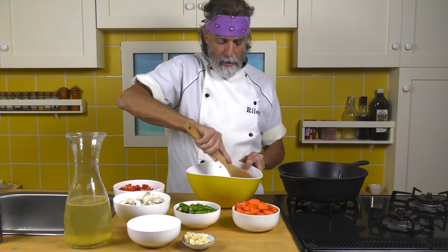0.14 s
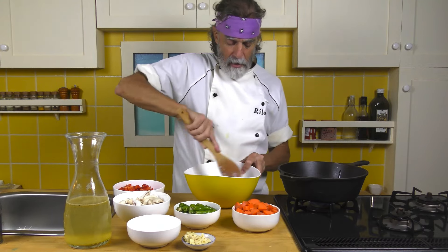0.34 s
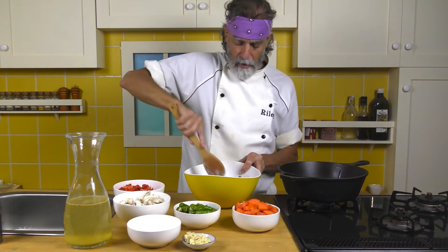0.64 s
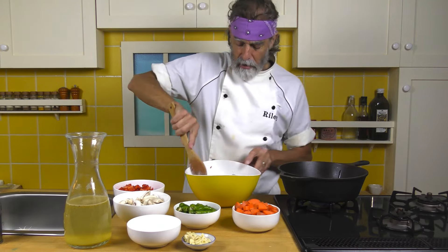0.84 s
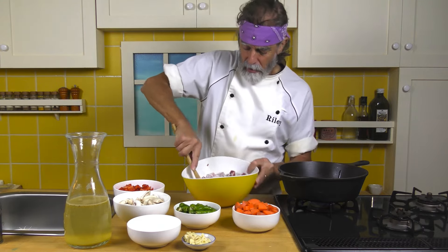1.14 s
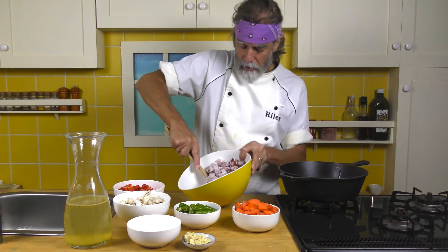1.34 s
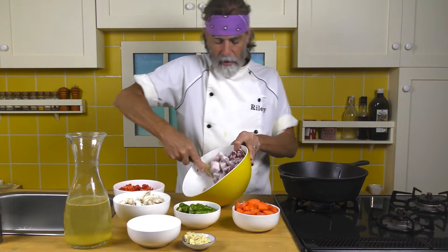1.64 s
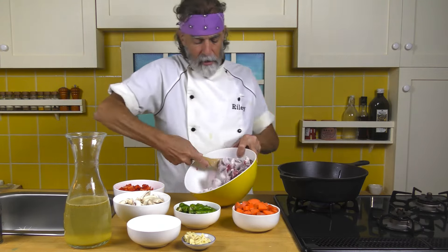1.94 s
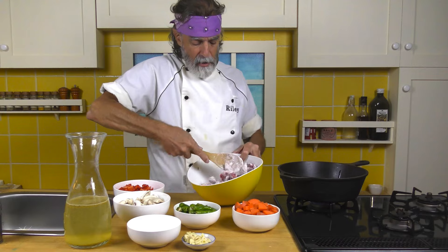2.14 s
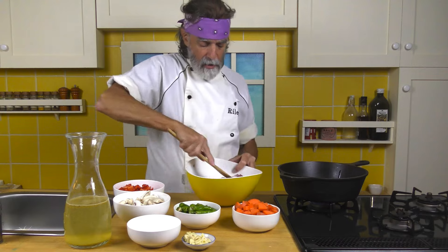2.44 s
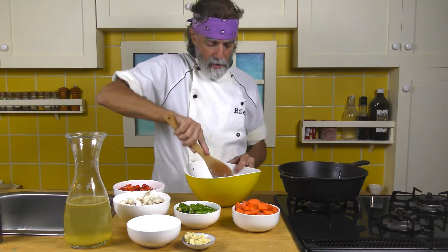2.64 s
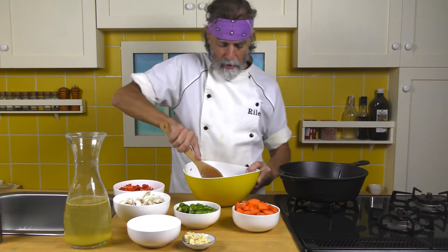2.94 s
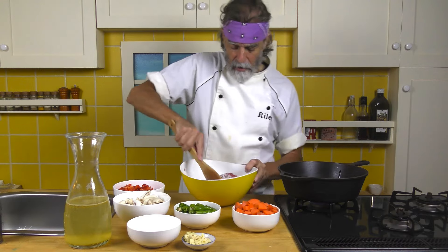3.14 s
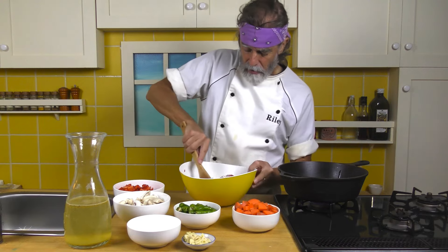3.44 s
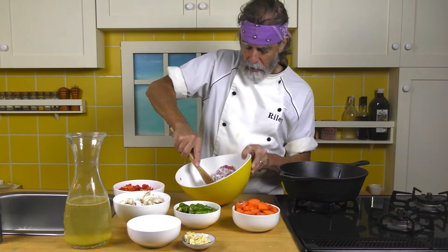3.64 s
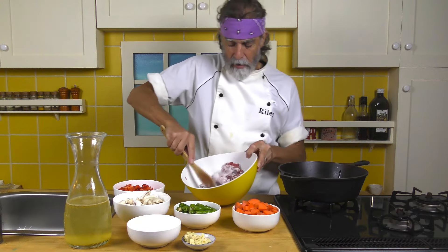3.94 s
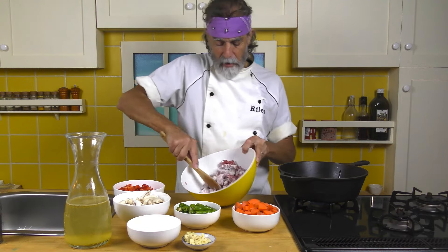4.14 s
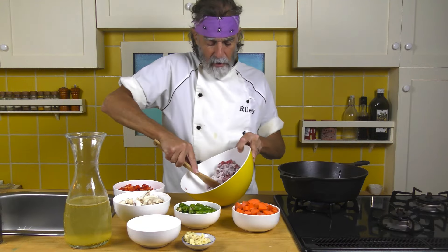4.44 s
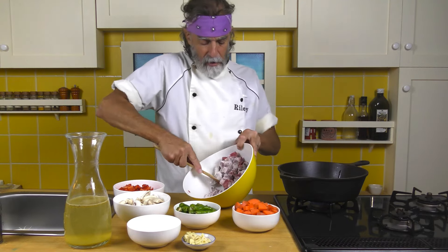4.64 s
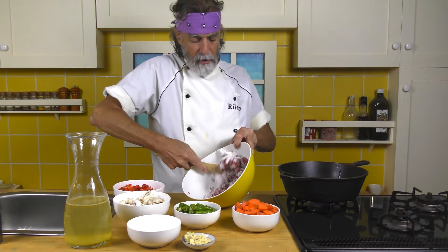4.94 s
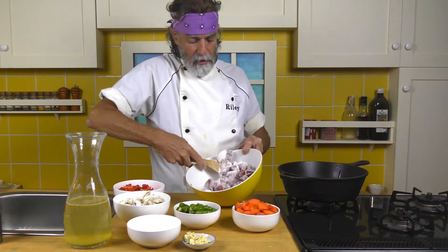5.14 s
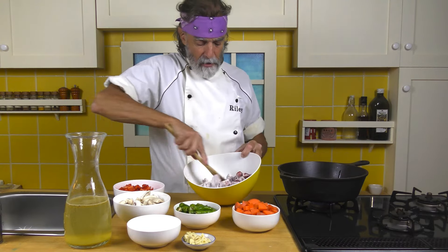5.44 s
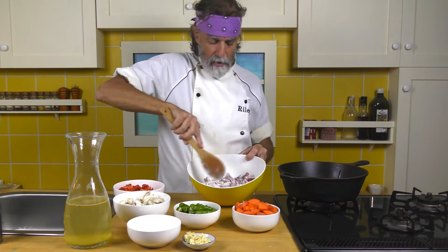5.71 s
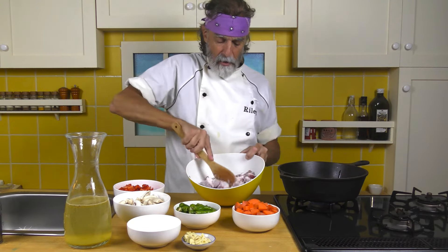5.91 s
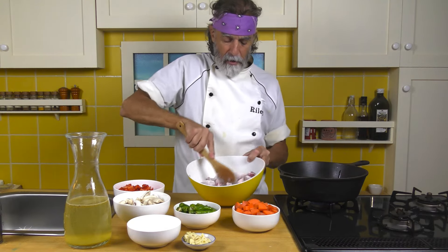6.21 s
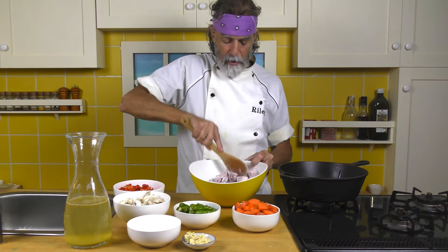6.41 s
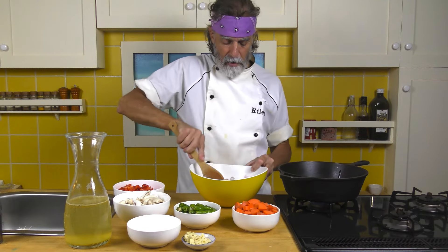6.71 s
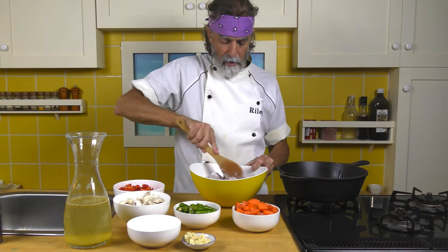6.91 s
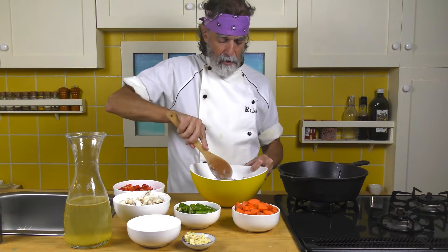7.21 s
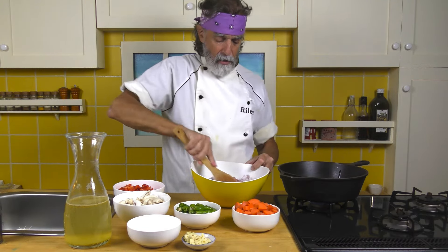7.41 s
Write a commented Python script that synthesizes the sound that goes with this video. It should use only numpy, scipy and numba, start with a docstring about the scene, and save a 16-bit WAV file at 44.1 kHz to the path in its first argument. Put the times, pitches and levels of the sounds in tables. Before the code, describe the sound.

Floured meat cubes are turned in a bowl: hollow wooden knocks, dry gritty scrapes, soft tumbling and pats, over faint ventilation hum.

```python
"""Wooden clacks and counter booms, rasping and hissing scrapes, soft tumbling, a faint ventilation hum.
A wooden spoon turns floured meat cubes in a mixing bowl on a wooden counter in a small tiled room.
Knocks are noise bursts and damped modes of bowl wall and counter; two long scoops and many short strokes
are random slip grains through a moving resonant high-pass; cubes are dense bumps and crumbling noise;
ventilation is coloured noise."""
import sys
import numpy as np
from scipy import signal
from scipy.fft import rfft, irfft, next_fast_len
from scipy.io import wavfile
from numba import njit

SR = 44100
rng = np.random.default_rng(int(sys.argv[2]) if len(sys.argv) > 2 else 0)


def dump_mix(stems):
    """Bounce the given channels to the path in sys.argv[1] as a 16-bit WAV at rate SR."""
    frames = np.atleast_2d(stems).T  # one column per channel
    limited = np.clip(frames, -1, 1)  # hard clip at full scale
    pcm = np.round(limited * 32767).astype(np.int16)
    wavfile.write(sys.argv[1], SR, pcm)


N = 333837
TIME = np.arange(N) / SR  # s
RING = np.arange(SR // 2) / SR  # time since a blow, s
LEFT_RIGHT = np.array([[1], [-1]])  # sign of the side signal
# a movement gains RISE_DB over its rise, holds, then dies away at a steady rate
RISE_DB, RELEASE_DB_PER_S = 18.5, 196

# two long scoops under the meat and up the tilted wall, levels before trims:
# each (time [s], rasp level [dB], flour hiss level [dB])
SCOOP_PATHS = [
    [(0.96, -49, -48), (1.148, -36, -42.5), (1.202, -37.5, -48), (1.232, -35.5, -38.5), (1.316, -36, -39),
     (1.374, -42.5, -52.5), (1.536, -37.5, -46), (1.602, -45.5, -50.5), (1.878, -45.5, -47),
     (1.96, -80, -77)],
    [(4.47, -51.5, -63), (4.5, -35.5, -45), (4.572, -38.5, -47), (4.638, -40.5, -55.5), (4.644, -37.5, -53),
     (4.696, -44, -51), (4.818, -37, -44), (5.02, -50.5, -48.5), (5.068, -41, -46), (5.14, -60, -59)],
]
# flour hiss spectrum: (frequency [Hz], density [dB per Hz])
FLOUR_SPECTRUM = [(2000, -16), (4000, 0.5), (6000, 2.5), (8000, 0.5), (10800, 1), (12500, -10),
                  (15500, -32.5)]


def undb(db):
    """Decibels to gain."""
    return 10 ** (np.asarray(db) / 20)


def unit(x):
    """Scale to rms 1."""
    return x / np.sqrt(np.mean(x ** 2))


def curves(table):
    """The dB columns of a timed table, sample by sample, dying away beyond both ends."""
    s, *columns = np.transpose(table)
    outside_s = np.abs(TIME - np.clip(TIME, s[0], s[-1]))
    return [np.interp(TIME, s, c) - RELEASE_DB_PER_S * outside_s for c in columns]


def colour(x, points):
    """Causal minimum-phase filter with a (Hz, dB) response, built from its cepstrum."""
    size = 2 * next_fast_len(x.shape[-1] // 2 + 2048)
    hz, db = np.transpose(points)
    bin_hz = np.arange(size // 2 + 1) * SR / size
    log_gain = np.log(undb(np.interp(np.log(bin_hz + 1), np.log(hz), db)))
    cepstrum = irfft(log_gain)
    cepstrum[1:size // 2] *= 2
    cepstrum[size // 2 + 1:] = 0
    response = np.exp(rfft(cepstrum))
    return irfft(rfft(x, size) * response)[..., :x.shape[-1]]


def walk(rate_hz):
    """Random wander with a spread near 1: straight lines between rate_hz random knots per second."""
    knots = rng.standard_normal(N // 100)
    return np.interp(TIME * rate_hz, np.arange(len(knots)), knots)


def fade(t60_s):
    """Exponential decay after a blow."""
    return np.exp(-np.log(1000) * RING / t60_s)


def burst(t60_s):
    """Decaying noise of energy 1: many modes too close to tell apart."""
    x = rng.standard_normal(len(RING)) * fade(t60_s)
    return x / np.linalg.norm(x)


def ring(modes, scatter_db, detune):
    """Damped modes of total energy 1; each point of contact weights and detunes them anew."""
    x = 0
    for hz, db, t60_s in modes:
        size, shift, side = rng.standard_normal(3)
        gain = np.sign(side) * undb(db + scatter_db * size)
        mode_hz = hz * (1 + detune * shift)
        x = x + gain * fade(t60_s) * np.sin(2 * np.pi * mode_hz * RING)
    return x / np.linalg.norm(x)


def grains(rate_hz, spread_db):
    """Tiny slips at random moments, most weak and a few strong, rms 1."""
    happens = rng.random(N) < rate_hz / SR
    sign = rng.choice([-1, 1], N)
    strength = undb(spread_db * np.minimum(rng.exponential(size=N), 4))
    return unit(happens * sign * strength)


@njit
def highpass(x, hz, damping):
    """Resonant second-order high-pass with a moving edge."""
    y, band, low = np.empty(len(x)), 0., 0.
    for i in range(len(x)):
        g = np.tan(np.pi * hz[i] / SR)
        v = (band + g * (x[i] - low)) / (1 + g * (g + damping))
        y[i] = x[i] - damping * v - (low + g * v)
        band, low = 2 * v - band, low + 2 * g * v
    return y


def kitchen(direct_db, build_s):
    """Stereo response of the room: the direct sound, then dense echoes from tiles and cupboards."""
    # side against mid: (frequency [Hz], level [dB])
    room_width = [(200, -3.5), (500, -13.5), (1100, -7), (2200, -5.5), (4000, -5.5), (7000, -50.5),
                  (13000, -14)]
    t60_s, treble_t60_s = 0.27, 0.23
    split = signal.butter(2, 4000, fs=SR, output="sos")
    noise = rng.standard_normal((2, len(RING)))
    dull = signal.sosfilt(split, noise)
    echoes = dull * fade(t60_s) + (noise - dull) * fade(treble_t60_s)
    echoes = echoes * (1 - np.exp(-RING / build_s))
    mid, side = echoes / np.linalg.norm(echoes, axis=1, keepdims=True)
    mid[0] += undb(direct_db)  # relative to all echoes together
    return (mid + LEFT_RIGHT * colour(side, room_width)) / np.linalg.norm(mid)


def in_room(x, room):
    """A sound as it arrives through the room."""
    return signal.fftconvolve(x[None], room, axes=1)[:, :len(x)]


def struck(x, db):
    """Set the rms level of the first 30 ms of a blow."""
    return x * undb(db) / np.sqrt(np.mean(x[:, :int(.03 * SR)] ** 2))


def swell(s, rise_s, hold_s):
    """Gain of one short movement: it speeds up, holds and dies away."""
    before_s = np.maximum(s - TIME, 0)
    after_s = np.maximum(TIME - s - hold_s, 0)
    return undb(-RISE_DB * before_s / max(rise_s, .003) - RELEASE_DB_PER_S * after_s)


def ventilation(gain_db, waver_db):
    """Steady low rush of air with a faint hiss: coloured stereo noise whose level wavers."""
    # spectrum of the air: (frequency [Hz], density [dB per Hz])
    air_spectrum = [(25, -28), (60, -9.5), (150, 1), (300, -6.5), (430, -13), (600, -27), (1000, -19),
                    (1500, -19.5), (1950, -17), (2400, -24), (4500, -33), (7000, -34), (11000, -31.5),
                    (15500, -35)]
    # side against mid: (frequency [Hz], level [dB])
    air_width = [(30, 2), (130, -12), (400, -8), (1500, -7.5), (4000, 1.5), (8000, -23), (13000, -2.5)]
    mid, side = colour(rng.standard_normal((2, N)), air_spectrum)
    rush = (mid + LEFT_RIGHT * colour(side, air_width)) / np.std(mid)
    return rush * undb(-57.5 + gain_db + waver_db * walk(rate_hz=4.5))


def tumbling(room, scoop_db, slump_db):
    """Soft, dense bumps of the cubes against the bowl: pushed along by each scoop, or slumping by themselves."""
    # heap of cubes slumps over, before trim: (full speed at [s], rise [s], hold [s], level [dB])
    slumps = [(0.423, 0.054, 0.088, -48.5), (0.688, .1, 0.08, -53), (1.0, .15, 0.071, -48.5),
              (1.742, 0.056, .03, -44), (6.287, 0.11, 0.014, -53), (7.499, 0.077, .02, -50.5)]
    # bump spectrum: (frequency [Hz], density [dB per Hz])
    tumble_spectrum = [(80, -21.5), (200, -6.5), (350, -4), (520, 6.5), (650, -4.5), (850, -11),
                       (1200, -9.5), (2500, -32)]
    pushed = sum(undb(curves(scoop)[0] + scoop_db) for scoop in SCOOP_PATHS)
    slumping = sum(swell(s, rise_s, hold_s) * undb(db + slump_db) for s, rise_s, hold_s, db in slumps)
    bumps = unit(colour(grains(rate_hz=550, spread_db=6.5), tumble_spectrum))
    return in_room(bumps * np.hypot(pushed, slumping), room)


def pats(pat_db, puff_db):
    """A floury cube peels off the wall and lands softly: a crumble of tiny contacts and a puff of powder. The
    same soft crumble at 3.156 s is the spoon's brief swish leading into the stroke after it."""
    # landings, and at 3.156 s a spoon swish, before trims: (time [s], pat level [dB], flour puff level [dB])
    landings = [(0.0744, -39.5, -70), (0.4086, -38, -62), (0.497, -34.5, -46), (0.7367, -39, -59),
                (3.156, -43, -61.5), (4.3934, -49, -45), (5.061, -44.5, -66), (5.261, -60, -49.5),
                (5.888, -45, -49.5), (6.0117, -66, -62), (6.286, -61, -55), (7.3947, -37, -59)]
    # pat spectrum: (frequency [Hz], density [dB per Hz])
    pat_spectrum = [(700, -17), (1250, -1.5), (1900, -3), (2700, 1.5), (3800, -1.5), (6000, -3.5),
                    (10000, -21)]
    out = np.zeros((2, N + len(RING)))
    for s, pat, puff in landings:
        contacts = burst(t60_s=0.11) * (1 - fade(t60_s=0.016))  # soft onset
        crumble = in_room(contacts, kitchen(direct_db=-2.5, build_s=0.0013))
        landing = struck(colour(crumble, pat_spectrum), pat + pat_db)
        landing += struck(colour(crumble, FLOUR_SPECTRUM), puff + puff_db)
        start = int(s * SR)
        out[:, start:start + len(RING)] += landing
    return out[:, :N]


def judders(slip_hz, ring_t60_s):
    """The foot of the bowl slips a few times in quick succession; the dull thuds swell and die away."""
    # foot on the counter: (start [s], length [s], level [dB])
    foot_slips = [(2.333, 0.073, -47), (5.133, 0.042, -46.5), (7.316, 0.039, -44)]
    # thud spectrum: (frequency [Hz], density [dB per Hz])
    judder_spectrum = [(150, -24), (350, 3), (470, 8.5), (580, -8), (800, -22.5), (2500, -38)]
    out = np.zeros(N + len(RING))
    for s, length_s, db in foot_slips:
        thuds = 0
        for delay_s in np.arange(0, length_s, 1 / slip_hz):
            force = np.sin(np.pi * (0.072 + 0.85 * delay_s / length_s))
            thud = burst(ring_t60_s) + undb(-3.0) * burst(t60_s=0.35)
            thuds = thuds + force * np.roll(thud, int(delay_s * SR))
        start = int(s * SR)
        # scaled so that db is the rms over the judder's own length
        level = undb(db) * np.sqrt(length_s / RING[-1])
        out[start:start + len(RING)] += unit(colour(thuds, judder_spectrum)) * level
    return out[:N]


def spoon_motion(scoop_rasp_db, scoop_hiss_db):
    """Gains of rasp and hiss and the pitch of the rasp; it is lowest at the bowl's bottom, rising up the wall."""
    # per scoop: (at the bottom [s], pitch there [Hz], climb [octaves per s])
    scoop_arcs = [(1.27, 1523, 1), (4.5, 1420, 1.4)]
    # short strokes through the flour, before trims:
    # (full speed at [s], rise [s], hold [s], rasp level [dB], flour hiss level [dB], rasp pitch [Hz])
    strokes = [(0.183, .13, 0.027, -39.5, -45, 1804), (0.247, .02, 0.051, -43, -70, 1800),
               (0.527, .04, .06, -45.5, -55, 1720), (0.767, .16, .005, -44, -47.5, 1780),
               (0.91, .03, 0.044, -59, -51.5, 1767), (2.37, 0.099, 0.058, -53, -54, 1650),
               (2.66, 0.043, 0.038, -54.5, -55.5, 1817), (2.813, 0.18, 0.018, -79, -59.5, 1920),
               (3.039, 0.087, 0.009, -54, -52, 2040), (3.183, .03, .11, -44.5, -59.5, 1770),
               (3.5, 0.2, 0.059, -59.5, -64, 1450), (3.729, .025, 0.034, -39, -48, 1222),
               (4.174, 0.026, 0.033, -36.5, -39, 1281), (4.403, 0.038, 0.024, -46, -51, 1330),
               (5.275, .035, .05, -63.5, -56, 1900), (5.538, 0.12, 0.042, -54, -62, 1570),
               (5.671, 0.079, 0.022, -73.5, -60, 1506), (5.85, 0.11, .02, -61.5, -57.5, 1340),
               (5.884, 0.017, 0.012, -46.5, -61, 1340), (6.144, .035, 0.032, -42, -47.5, 1400),
               (6.28, .14, 0.0092, -53, -61, 1269), (6.494, 0.093, 0.055, -48.5, -60.5, 1385),
               (6.753, 0.11, 0.0038, -56.5, -66, 1400), (7.402, 0.074, 0.1, -51.5, -59, 1570)]
    moves = []
    for scoop, (bottom_s, hz, climb) in zip(SCOOP_PATHS, scoop_arcs):
        rasp_db, hiss_db = curves(scoop)
        octaves = np.minimum(climb * np.abs(TIME - bottom_s), 1)
        moves.append((undb(rasp_db + scoop_rasp_db), undb(hiss_db + scoop_hiss_db), hz * 2 ** octaves))
    for s, rise_s, hold_s, rasp_db, hiss_db, hz in strokes:
        speed = swell(s, rise_s, hold_s)
        moves.append((speed * undb(rasp_db), speed * undb(hiss_db), hz))
    rasp_power = sum(rasp ** 2 for rasp, _, _ in moves)
    hiss_power = sum(hiss ** 2 for _, hiss, _ in moves)
    edge_hz = sum(rasp ** 2 * hz for rasp, _, hz in moves) / rasp_power
    return np.sqrt(rasp_power), np.sqrt(hiss_power), edge_hz


def wall_spots(x, ring_t60_s, shift_hz, count):
    """The contact wanders over the wall; every spot has its own brief resonances and its own echoes."""
    nearness = np.exp(.8 * np.array([walk(shift_hz) for _ in range(count)]))
    nearness /= np.linalg.norm(nearness, axis=0)
    out = 0
    for share in nearness:
        spot = in_room(burst(ring_t60_s), kitchen(direct_db=4.5, build_s=0.0017))
        out = out + in_room(share * x, spot)
    return out


def scraping(rasp_db, hiss_db, fine_db, pressure_db, brightening):
    """Wood sticks and slips on flour: coarse slips rasp in the wall, fine powder hisses above them."""
    # spectra of rasp and finest hiss: (frequency [Hz], density [dB per Hz])
    rasp_spectrum = [(500, 2.5), (2050, 0), (2700, -1.5), (4200, -1), (6000, -19), (10000, -41.5)]
    fine_spectrum = [(8000, -21), (13000, 2), (15500, -9.5)]
    rasp_gain, hiss_gain, edge_hz = spoon_motion(scoop_rasp_db=1.0, scoop_hiss_db=1.5)
    slips = highpass(grains(rate_hz=3000, spread_db=3.8), edge_hz, .44)
    slips = highpass(slips, .8 * edge_hz, 1.0)
    powder = grains(rate_hz=6000, spread_db=1.5)
    rasp = unit(colour(slips, rasp_spectrum)) * rasp_gain * undb(rasp_db)
    hiss = unit(colour(powder, FLOUR_SPECTRUM)) * hiss_gain * undb(hiss_db)
    # only the strongest hiss reaches the very top
    fine_gain = undb(fine_db) * (hiss_gain / hiss_gain.max()) ** brightening
    fine = unit(colour(rng.standard_normal(N), fine_spectrum)) * fine_gain
    pressure = undb(pressure_db * walk(rate_hz=59))
    return wall_spots((rasp + hiss + fine) * pressure, ring_t60_s=0.017, shift_hz=12, count=8)


def knocks(boom_db, hollow_db, rim_db, tick_db, modes_db, crack_db):
    """Each blow cracks at the contact, rings the wall of the bowl and booms through the counter."""
    # spoon and bowl, before trims:
    # (time [s], counter boom [dB], hollow wall [dB], rim [dB], contact tick [dB])
    blows = [(0.1262, -23.5, -23.5, -27, -49), (0.2388, -17, -21.5, -28.5, -39),
             (0.5369, -21.5, -23.5, -32, -45.5), (0.767, -51.5, -44, -29.5, -41.5),
             (0.889, -35.5, -34, -34, -64), (1.2195, -44, -39.5, -32, -42), (2.5129, -28, -35, -51, -74),
             (2.6034, -29, -38, -49.5, -65), (2.616, -28.5, -34.5, -46.5, -68),
             (3.1899, -19, -23.5, -25, -33), (3.2231, -20.5, -23, -28.5, -47),
             (3.7299, -37.5, -34.5, -31, -39), (4.173, -38.5, -38, -31.5, -38.5),
             (4.6432, -49, -39, -39, -52), (6.474, -32, -41, -52, -71), (6.5204, -23.5, -34.5, -43, -65),
             (6.533, -25.5, -43, -56, -71), (6.6116, -29.5, -33, -46.5, -70),
             (6.682, -35.5, -64.5, -65, -84), (7.5227, -20, -20.5, -25, -30)]
    # modes of bowl on counter and of bowl wall: (frequency [Hz], relative level [dB], t60 [s])
    counter_modes = [(226.4, -12.5, .26), (250, -21, 0.55), (294.3, -9, 0.24), (328.8, -13, 0.29),
                     (348.5, -10.5, 0.37), (377.6, -2, 0.26), (415.5, -3.5, 0.24), (468, -3, 0.25),
                     (486, -4.5, 0.12), (545, -13.5, 0.27)]
    wall_modes = [(645, -14, 0.054), (710, 3.5, 0.22), (989, -19, 0.067), (1052.6, 0.5, 0.13),
                  (1215, 5, 0.097), (1320, -3, 0.03), (1462, 7.5, 0.047), (1820, -2, 0.069),
                  (1960, 4, 0.056), (2090, 1.5, 0.04), (2330, -15, 0.061), (2770, 3, 0.072),
                  (4220, 4, 0.027)]
    # spectra: (frequency [Hz], density [dB per Hz]); boom_band shapes modes and boom noise together
    boom_spectrum = [(25, -72), (70, -57.5), (150, -26), (215, -6), (260, -4), (400, 3), (520, -2.5),
                     (700, -17), (1200, -52.5)]
    boom_band = [(25, -53.5), (80, -33.5), (150, -5.5), (220, 1.5), (400, -2), (600, 0), (1500, -20.5)]
    hollow_spectrum = [(350, -20), (620, -1), (760, -1), (1050, -0.5), (1400, -2.5), (1900, -8),
                       (3000, -56.5)]
    rim_spectrum = [(900, -23.5), (1400, -17), (1800, 1), (2300, 0), (3000, -5.5), (3800, -14.5),
                    (6000, -65.5)]
    tick_spectrum = [(1800, -29.5), (3000, 3), (4200, 2), (6000, -8), (8000, -11), (11000, -28),
                     (15000, -62)]
    # the sharper the tick, the more the direct sound stands out; at crisp_tick_db it equals the echoes
    crisp_tick_db, direct_db_per_tick_db = -29.5, 0.17
    out = np.zeros((2, N + len(RING)))
    for s, boom, hollow, rim, tick in blows:
        wall = undb(modes_db) * ring(wall_modes, scatter_db=10.5, detune=0.0033)
        wall = wall + undb(crack_db) * burst(t60_s=0.023)
        wall[0] += 1  # contact impulse
        # the bowl has moved and tilted since the last blow, so the echoes differ
        direct_db = direct_db_per_tick_db * (tick - crisp_tick_db)
        wall = in_room(wall, kitchen(direct_db, build_s=0.0011))
        counter = ring(counter_modes, scatter_db=2.5, detune=.005)
        counter = counter + undb(14.5) * colour(burst(t60_s=0.28), boom_spectrum)
        counter = counter + LEFT_RIGHT * undb(5.5) * colour(burst(t60_s=0.27), boom_spectrum)
        blow = struck(colour(counter, boom_band), boom + boom_db)
        blow += struck(colour(wall, hollow_spectrum), hollow + hollow_db)
        blow -= struck(colour(wall, rim_spectrum), rim + rim_db)
        blow += struck(colour(wall, tick_spectrum), tick + tick_db)
        start = int(s * SR)
        out[:, start:start + len(RING)] += blow
    return out[:, :N]


def scene():
    """The bowl sits near the middle, a shade to the left, over the ventilation."""
    bowl = knocks(boom_db=0.33, hollow_db=0.56, rim_db=0.0, tick_db=2.0, modes_db=-16, crack_db=-4)
    bowl += scraping(rasp_db=-0.68, hiss_db=0.16, fine_db=-42.5, pressure_db=1.5, brightening=2.1)
    bowl += tumbling(kitchen(direct_db=-6.5, build_s=0.0027), scoop_db=-16, slump_db=-0.6)
    bowl += pats(pat_db=-10.5, puff_db=-8)
    bowl += judders(slip_hz=75.9, ring_t60_s=0.039)
    left_db = .25  # left up, right down by this much
    return bowl * undb(left_db * LEFT_RIGHT) + ventilation(gain_db=0.65, waver_db=3.5)


def record(dry):
    """A clean microphone with a steep cut at the top."""
    top_hz = 15750
    return signal.sosfilt(signal.ellip(10, .2, 80, top_hz, fs=SR, output="sos"), dry)


dry = scene()
out = record(dry)
dump_mix(out)
```